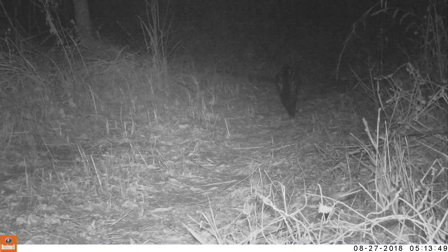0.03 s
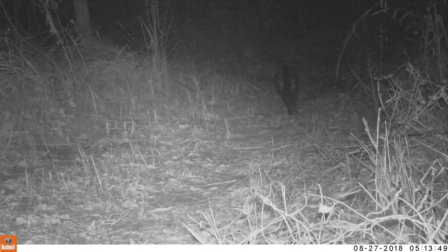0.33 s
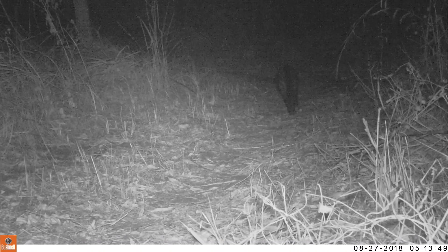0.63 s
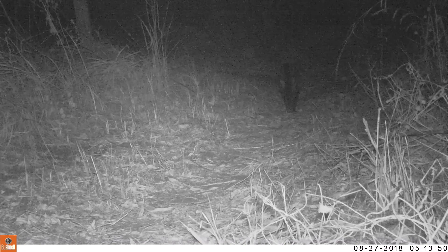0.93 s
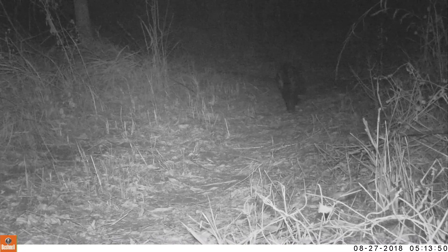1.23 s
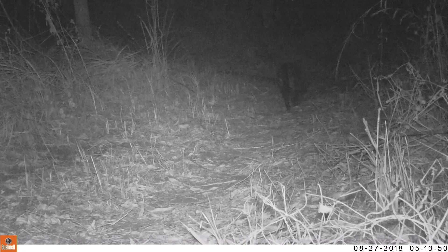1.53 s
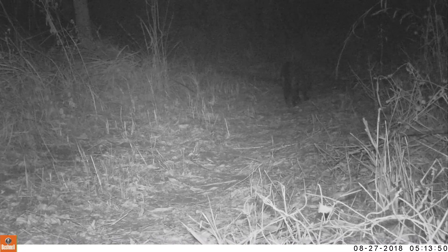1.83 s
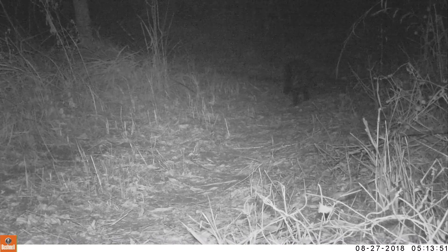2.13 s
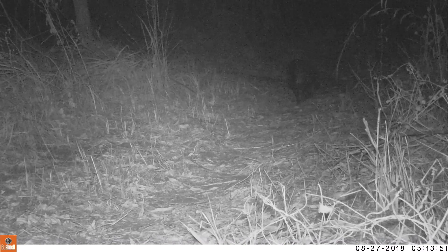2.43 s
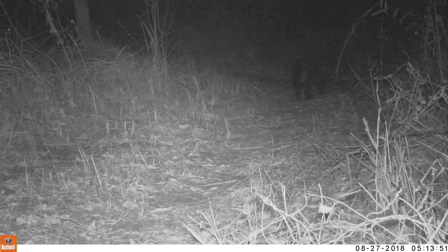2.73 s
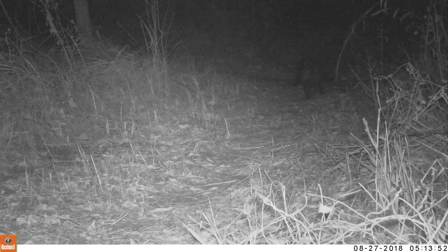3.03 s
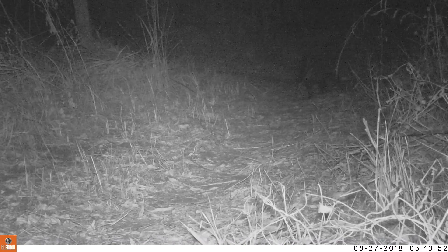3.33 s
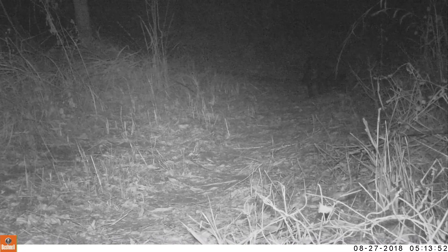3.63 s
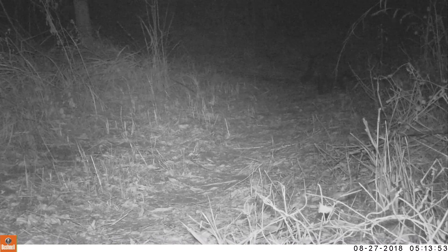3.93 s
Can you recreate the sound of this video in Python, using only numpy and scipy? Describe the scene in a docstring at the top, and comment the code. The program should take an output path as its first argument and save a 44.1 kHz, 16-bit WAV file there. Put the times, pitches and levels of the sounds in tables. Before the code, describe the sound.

Soft, steady outdoor night rumble and hiss, with distant insects and faintly rustling dry grass.

```python
"""Still night in open grassland

A small trail camera's one microphone hears a low rumble of air under an even hiss, with one soft bump.
Far insects blend into a faint band; a distant one gives three trills near 4 kHz, a pulse per wing stroke.
Dry stems tick and brushed blades rustle faintly as an animal walks away."""
import sys
import numpy as np
from scipy.fft import rfft, irfft, next_fast_len
from scipy.io import wavfile
from scipy.ndimage import map_coordinates

SR = 44100
rng = np.random.default_rng(int(sys.argv[2]) if len(sys.argv) > 2 else 0)


def generate_wav(sig):
    """Save sig (samples, or channels by samples) to the path in sys.argv[1] as 16-bit PCM at SR."""
    pcm = np.round(np.clip(np.atleast_2d(sig).T, -1, 1) * 32767).astype(np.int16)
    wavfile.write(sys.argv[1], SR, pcm)


N = 176400

# colour of the air's rumble: frequency_hz, relative_db
RUMBLE_COLOUR = [(3, 4), (18, 4.5), (28, 0.5), (52, -2.5), (80, -8), (125, -10.5), (200, -16.5), (310, -21),
                 (500, -26), (800, -32.5), (1500, -44.5), (4000, -79)]
# the rumble at the microphone: time_s, level_db
RUMBLE_LEVELS = [(0, -49.5), (.15, -50), (.35, -50), (.85, -49), (1.25, -51), (1.45, -49), (1.62, -50),
                 (1.8, -48.5), (2.02, -50.6), (2.6, -49.5), (3.1, -50), (3.45, -50), (3.68, -50),
                 (3.85, -50.5), (4, -49.5)]
# hiss, coloured by the camera's housing: frequency_hz, relative_db
HISS_COLOUR = [(200, -5.5), (1000, 0.5), (1700, 0.5), (2280, 0), (2500, -2.5), (3000, -4), (3550, -3),
               (3700, -2.5), (4100, -1.5), (4350, -4), (4700, -8), (5300, -11), (6200, -12.5),
               (7500, -13.5), (12000, -14), (14000, -16)]
# the band of the farthest insects: frequency_hz, relative_db
CHORUS_COLOUR = [(3000, -33), (3550, -14), (3680, -0.5), (3950, -2.5), (4100, -7), (4400, -30)]
# their slow swells: time_s, level_db
CHORUS_LEVELS = [(0, -86), (.55, -81.5), (1.0, -84), (1.65, -86), (1.88, -80.5), (2.45, -82.5), (3.4, -84),
                 (4, -84)]
# colour of dry grass: frequency_hz, relative_db
GRASS_COLOUR = [(1000, -29), (6000, -17), (9000, -11), (10500, -5), (12000, 4), (13000, -7), (13800, -10),
                (16000, -30)]
# blades brushed aside: centre_s, half_width_s, level_db
BLADE_RUSTLES = [(.092, .008, -83), (.982, 0.011, -82), (1.255, 0.031, -80), (2.085, .022, -82),
                 (2.14, 0.011, -83.5), (3.44, .012, -82)]
# dry stems ticking: start_s, level_db
STEM_TICKS = [(.0865, -71), (.0905, -65), (.9745, -70), (1.208, -70), (1.2442, -56), (2.0833, -71),
              (3.4368, -70), (3.440, -69.5), (3.932, -69)]
# one distant insect's trills: start_s, length_s, level_db
INSECT_TRILLS = [(.125, .22, -74.7), (.76, .24, -74.1), (1.41, .225, -75.1)]
# colour of the low bump: frequency_hz, relative_db
BUMP_COLOUR = [(25, -5), (70, 0.5), (120, -7.5), (240, -10), (400, -27), (1500, -60)]


def amp(db):
    """Decibels to gain."""
    return 10 ** (np.asarray(db) / 20)


def unit(x):
    """Scale to rms 1."""
    return x / np.sqrt(np.mean(x ** 2) + 1e-20)


def wobble(per_s):
    """A smooth random curve with per_s knots a second."""
    return map_coordinates(rng.standard_normal(N // 8), [np.arange(N) * per_s / SR], mode="wrap")


def filtered(x, response):
    """Filter x by a gain that depends on frequency."""
    size = next_fast_len(N + SR // 2)
    return irfft(rfft(x, size) * response(np.fft.rfftfreq(size, 1 / SR)), size)[:N]


def noise(colour):
    """Noise of rms 1, its colour interpolated on a log frequency axis."""
    knots_hz, db = np.transpose(colour)
    white = rng.standard_normal(N)
    return unit(filtered(white, lambda hz: amp(np.interp(np.log(hz + 1), np.log(knots_hz + 1), db))))


def air_rumble(t, sway_db=.58):
    """Night air over open ground rumbles low, its level gently swaying."""
    level_db = np.interp(t, *np.transpose(RUMBLE_LEVELS)) + sway_db * wobble(per_s=15)
    return amp(level_db) * noise(RUMBLE_COLOUR)


def camera_hiss(level_db=-68):
    """Steady hiss, coloured by the housing around the microphone."""
    return amp(level_db) * noise(HISS_COLOUR)


def far_chorus(t):
    """Many insects, far out in the grass, merge into a soft shimmer."""
    return amp(np.interp(t, *np.transpose(CHORUS_LEVELS))) * noise(CHORUS_COLOUR)


def blade_rustles(t, grain_db=1):
    """Blades brushed aside by the animal give short grainy swells."""
    swells = sum(amp(db) * np.exp(-.5 * ((t - centre) / half) ** 2) for centre, half, db in BLADE_RUSTLES)
    grains = unit(amp(grain_db * wobble(per_s=750)) * noise(GRASS_COLOUR))
    return swells * grains


def stem_ticks(t, rise_s=.0003, t60_s=.008):
    """Single dry stems tick, each a bright burst that dies at once."""
    envelope = np.zeros(N)
    for start, db in STEM_TICKS:
        age = np.maximum(t - start, 0)
        envelope += amp(db) * (1 - np.exp(-age / rise_s)) * np.exp(-np.log(1000) * age / t60_s)
    return envelope * noise(GRASS_COLOUR)


def insect_trills(t, pitch_hz=4115, wander_hz=110, pulse_hz=37, pulse_depth=.5):
    """Each wing stroke is one pulse of a high tone, blurred by the distance."""
    attack_s, release_s = .02, .045
    blurred_hz = pitch_hz + wander_hz * wobble(per_s=400)
    tone = np.sin(2 * np.pi * np.cumsum(blurred_hz) / SR)
    envelope = np.zeros(N)
    for start, length, db in INSECT_TRILLS:
        age = t - start
        gate = np.clip(age / attack_s, 0, 1) * np.clip((length - age) / release_s, 0, 1)
        strokes = 1 - pulse_depth * np.cos(2 * np.pi * pulse_hz * age)
        envelope += amp(db) * gate * strokes
    return envelope * tone


def low_bump(t, centre_s=2.432, half_width_s=.016, level_db=-50):
    """One soft, low bump within the rumble."""
    swell = np.exp(-.5 * ((t - centre_s) / half_width_s) ** 2)
    return amp(level_db) * swell * noise(BUMP_COLOUR)


def scene():
    """Air, insects and grass all reach one microphone."""
    t = np.arange(N) / SR
    bed = air_rumble(t) + camera_hiss() + far_chorus(t)
    events = blade_rustles(t) + stem_ticks(t) + insect_trills(t) + low_bump(t)
    return (bed + events)[None]


def record(dry):
    """The camera keeps nothing above its band limit."""
    top_hz = 13950
    return np.array([filtered(x, lambda hz: 1 / np.sqrt(1 + (hz / top_hz) ** 300)) for x in dry])


dry = scene()
out = record(dry)
generate_wav(out)
```